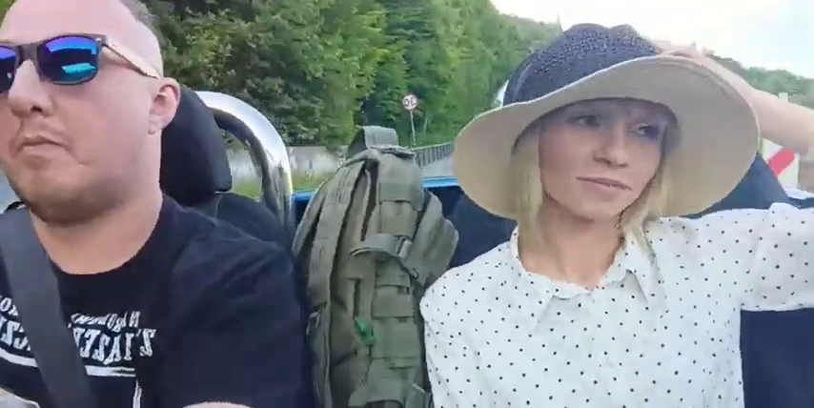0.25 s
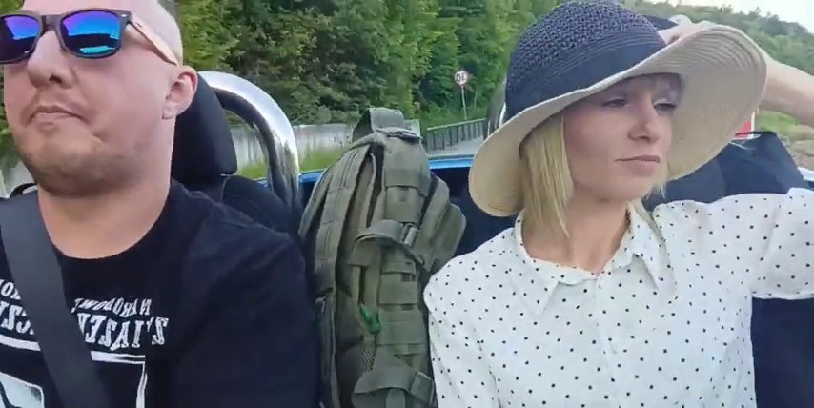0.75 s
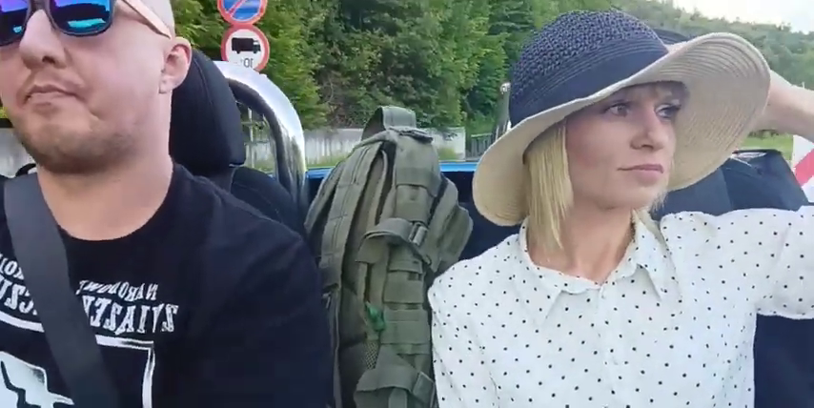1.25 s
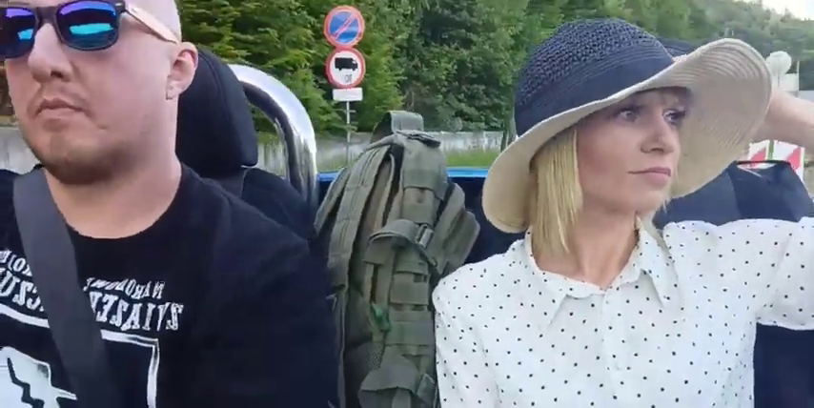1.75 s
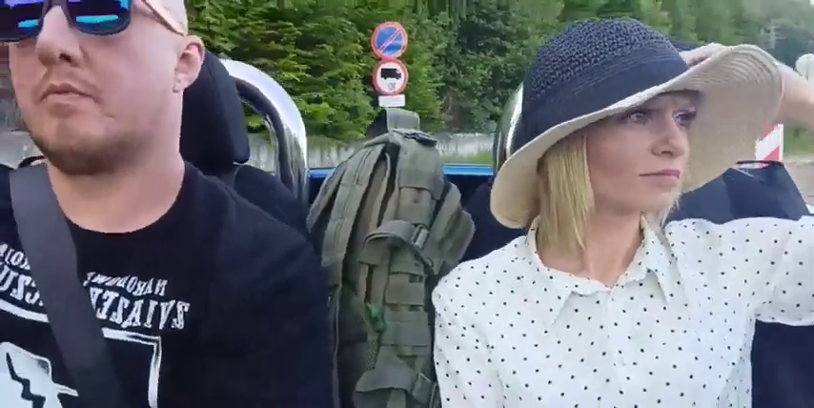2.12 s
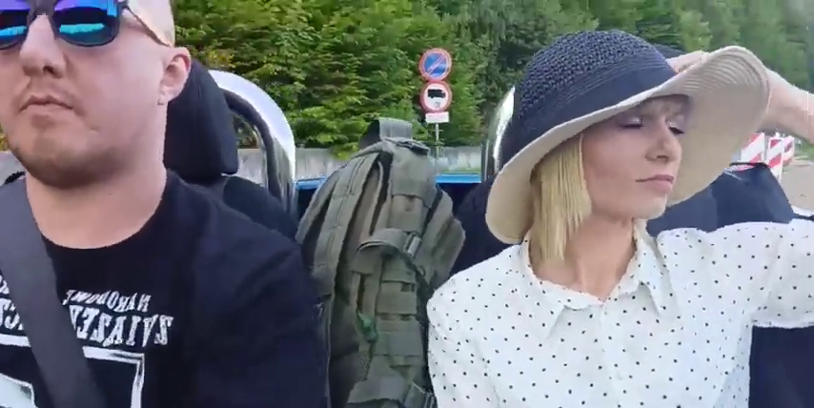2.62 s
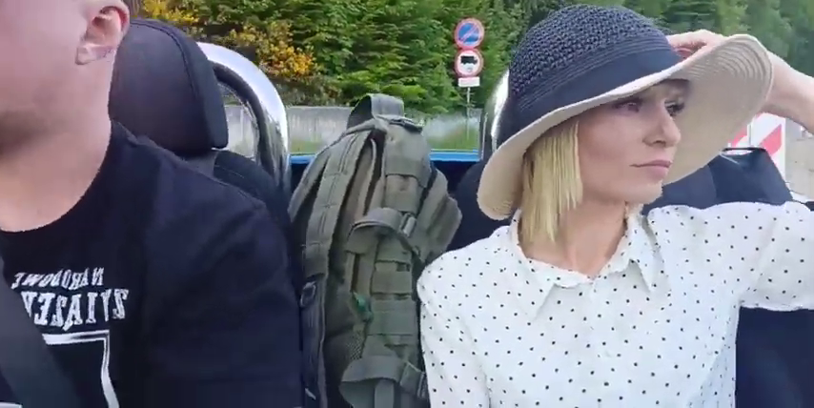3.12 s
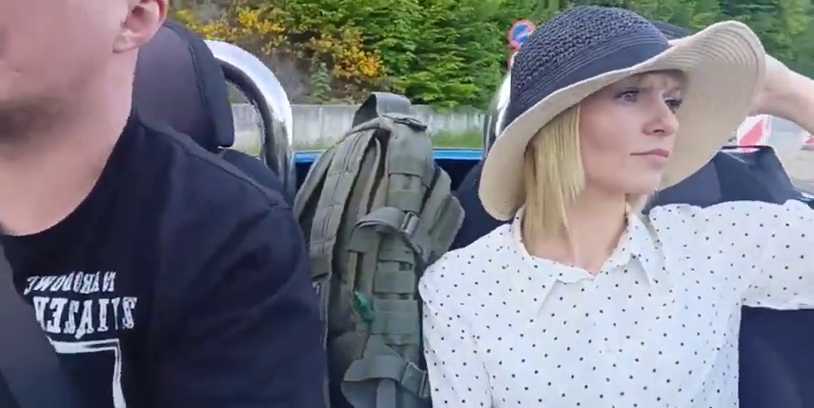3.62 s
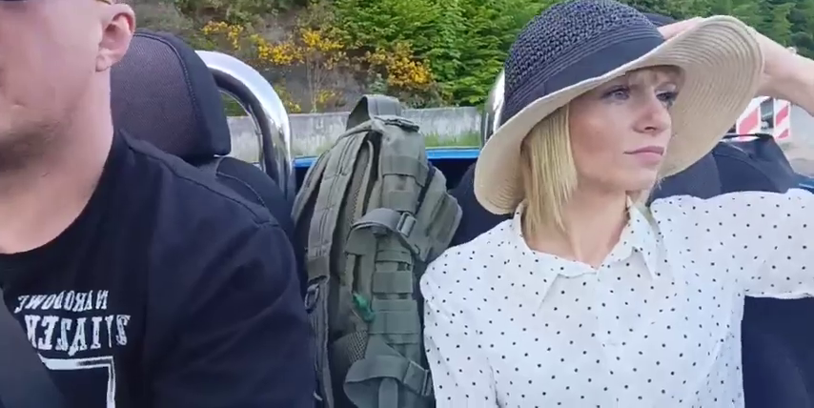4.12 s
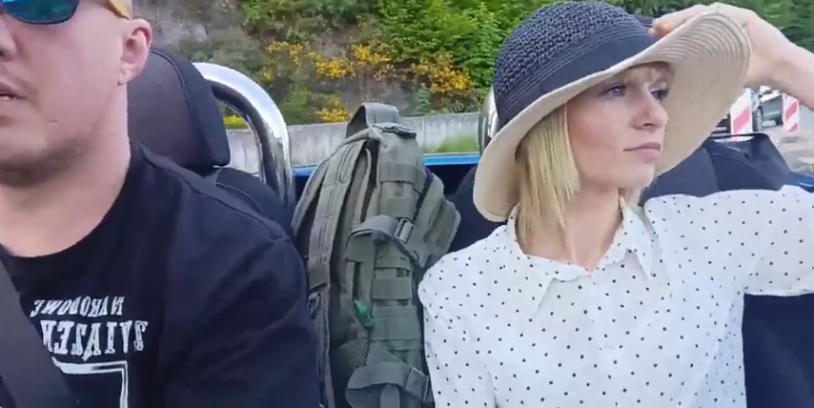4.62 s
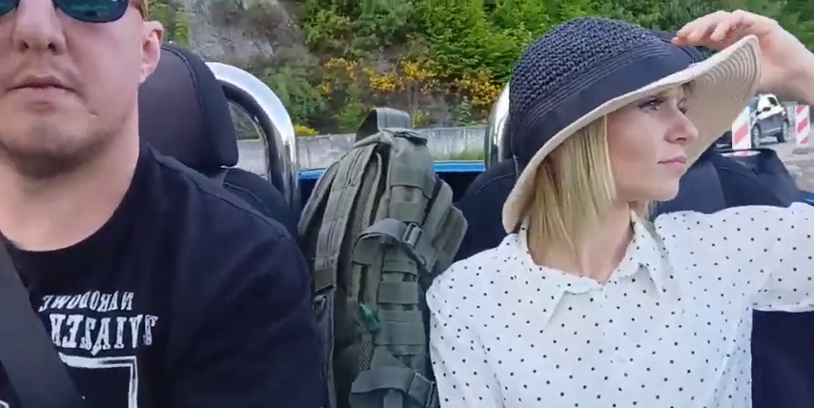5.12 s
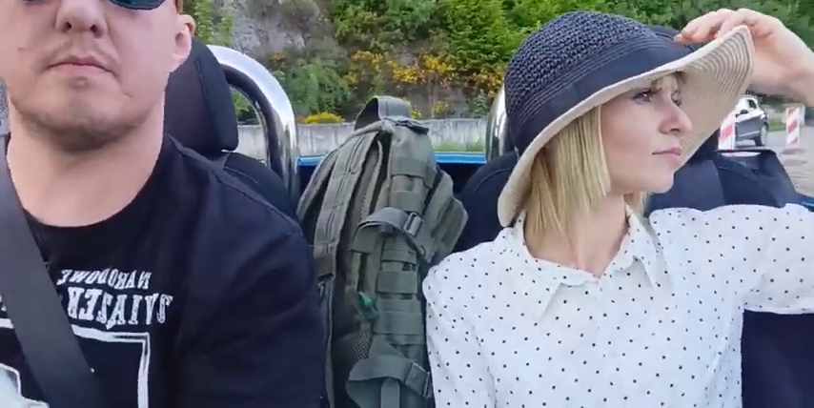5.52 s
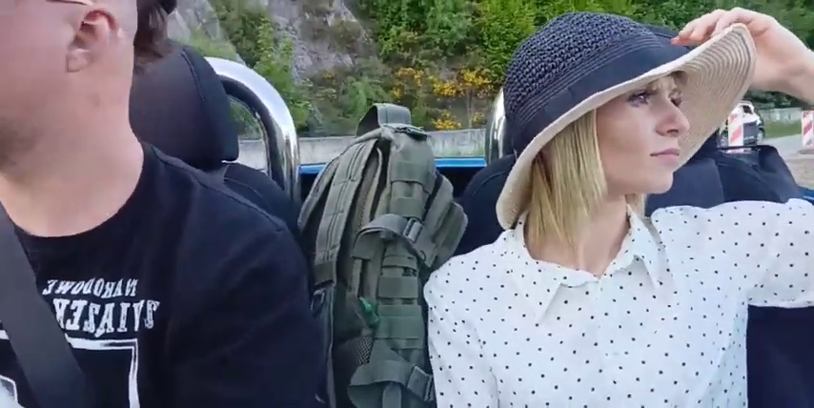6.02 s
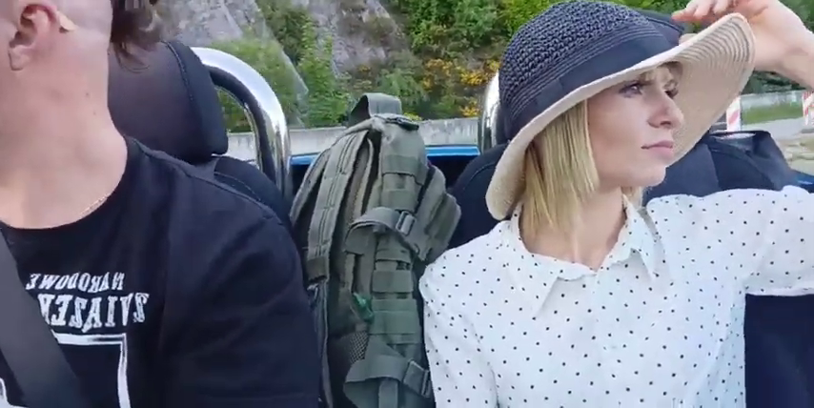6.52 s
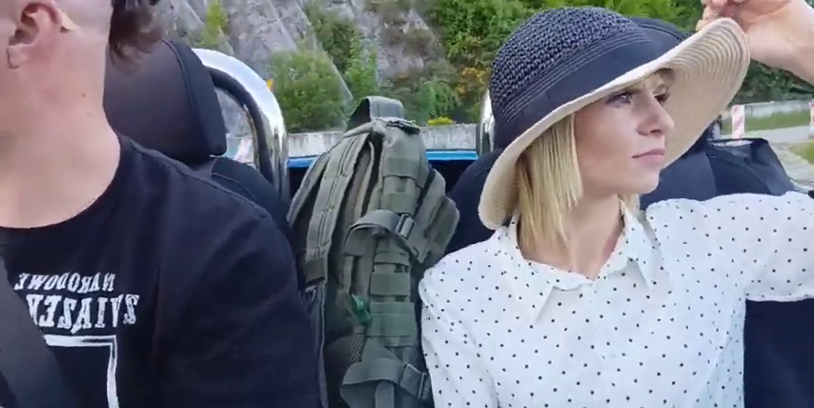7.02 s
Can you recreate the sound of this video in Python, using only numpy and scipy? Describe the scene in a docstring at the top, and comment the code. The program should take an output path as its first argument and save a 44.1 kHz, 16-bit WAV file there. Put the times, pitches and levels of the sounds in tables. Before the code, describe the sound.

Inside a moving convertible with the roof down, a microphone on a plastic mount picks up dull low road roar, a faint engine drone and bassy wind buffeting. Jolts thud through the body again and again, trim panels clack, a hard catch clicks, and the mount squeaks in tiny dry chirps. The start is windy and bumpy, the middle quieter with a sharp clack near three seconds, and the end rough again with a very heavy thump.

```python
"""Cabin of an open convertible on an uneven road, heard at a microphone on a plastic mount.
Engine, wind boom, tyre roar, tyre howl and air hiss are shaped noise that swells and flickers.
Jolts are damped sines with panel noise; trim knocks are short bursts of resonant noise.
A hard catch clicks by noise snaps and ringing modes; the mount squeaks by stick-slip."""
import sys
import numpy as np
from scipy import signal
from scipy.fft import rfft, irfft, next_fast_len
from scipy.io import wavfile
from scipy.ndimage import uniform_filter1d, map_coordinates

SR = 44100
rng = np.random.default_rng(int(sys.argv[2]) if len(sys.argv) > 2 else 0)


def put_to_file(sound):
    """Save the sound as 16-bit audio at rate SR, in the file named by the first command-line argument."""
    columns = np.atleast_2d(sound).T  # one column per channel
    safe = np.clip(columns, -1, 1)
    whole_steps = np.round(safe * 32767)
    wavfile.write(sys.argv[1], SR, whole_steps.astype(np.int16))


N = 319901
HIT_T = np.arange(SR // 5) / SR  # time axis of one contact, s
PEAK_S = 0.04  # peak of a stroke on that axis
MIC_LOW_HZ, TOP_HZ = 33, 15700  # band limits of the microphone
BOOM_DB, ROAR_DB, HOWL_DB, HISS_DB = 4, 1.64, -4, -1  # offsets to the RIDE levels
KNOCK_RISE_SHARE = 0.034  # rise over t60: long knocks are soft scuffs

# Base levels of the ride, before offsets: time_s, boom_db, roar_db, howl_db, hiss_db
RIDE = [(0.0, -21, -28.5, -37.5, -49.5), (0.52, -36.5, -28, -40, -49.5), (0.99, -31.5, -28.5, -47, -57.5),
        (1.69, -37.5, -30, -37, -48.5), (2.18, -39, -34.5, -47.5, -61), (3.07, -41, -32, -44, -52),
        (3.55, -39.5, -32.5, -38.5, -51), (3.78, -35, -34, -42, -53.5), (4.3, -32.5, -30, -41, -56.5),
        (4.81, -32.5, -31.5, -42, -55), (5.23, -33.5, -31, -43, -54.5), (5.57, -31, -30.5, -36.5, -53.5),
        (6.74, -32.5, -33, -42, -52), (7.25, -29.5, -25.5, -39.5, -52.5)]
# Gusts on the microphone, lulls where negative: peak_s, half_height_length_s, boom_swell_db
GUSTS = [(0, 0.081, -15), (.31, 0.13, 6), (.87, 0.15, -14), (1.0, 0.14, 7), (2.45, 0.23, 4),
         (2.87, 0.039, 4.5), (3.31, 0.074, 12), (3.46, .07, -22), (3.54, 0.052, 11.5), (5.33, 0.052, -9),
         (5.88, 0.075, 8.5), (6.3, 0.076, 6), (6.5, 0.066, 13.5), (7.15, 0.074, -8)]
# Rough patches, smooth where negative: middle_s, half_height_length_s, roar_swell_db, howl_swell_db
PATCHES = [(0.024, 0.052, 7, 7.5), (0.243, 0.08, 8.5, 6.5), (0.47, 0.097, 8, 3), (0.72, 0.064, -7, 14),
           (1.372, 0.042, 9.5, 10.5), (1.462, 0.04, 10, 4), (1.647, 0.014, -7, 13.5),
           (2.545, 0.11, -1, 9.5), (2.783, 0.036, 3.5, 17), (3.115, 0.081, 5, 11),
           (3.328, 0.044, 1.5, 14.5), (3.68, 0.11, 6, 7.5), (4.222, 0.07, -4, 8), (5.345, 0.023, 4, 13),
           (5.41, 0.1, 7.5, 16), (5.762, 0.044, -9.5, -4), (5.832, 0.048, 6, 6.5), (5.992, 0.2, 9, 5.5),
           (6.577, 0.069, 12, 15), (6.669, 0.024, -3.5, 0), (6.724, 0.094, 9, 10.5), (7.145, 0.11, -6.5, 9)]
# Wind boom spectrum: freq_hz, relative_density_db
BOOM_SPECTRUM = [(20, -29), (32, -25), (42, -7), (52, 2.5), (65, 4), (85, -1), (110, -8.5), (170, -32),
                 (400, -108)]
# Road roar spectrum: freq_hz, relative_density_db
ROAD_SPECTRUM = [(50, -19.5), (85, -2), (110, 1.5), (145, 1.5), (190, -4.5), (280, -6), (350, -14.5),
                 (430, -17.5), (560, -26.5), (1050, -37.5), (1600, -39), (4000, -85)]
# Tyre resonances: center_hz, width_hz, relative_level_db
TYRE_RESONANCES = [(433, 210, -11), (528, 72, 4.5), (653, 83, 1.5), (840, 120, -5)]
# Air hiss spectrum: freq_hz, relative_density_db
AIR_SPECTRUM = [(300, -26.5), (800, 11), (1200, 3), (1550, -2), (2000, 5.5), (2600, 1.5), (3000, -2),
                (3500, -9.5), (5000, -11.5), (7200, -12.5), (7800, -21), (9500, -26), (11000, -45.5),
                (15000, -57.5)]
# Friction noise spectrum: freq_hz, relative_density_db
GRIT_SPECTRUM = [(400, -29), (800, -5), (2000, 9), (3000, 0.5), (3600, 1), (7100, -10), (8000, -12.5),
                 (13000, -42.5)]
# Blows of the trim: time_s, relative_level_db, relative_crack_db, t60_s
KNOCKS = [(0.128, -24, -32, 0.065), (0.194, -17, -22, 0.12), (0.243, -31, -26, 0.14),
          (0.271, -17.5, -22.5, 0.033), (0.279, -18, -27, 0.043), (0.504, -25.5, -27, 0.08),
          (1.786, -28, -38, 0.069), (2.372, -34.5, -28, 0.19), (2.513, -27.5, -14.5, 0.17),
          (2.774, -31.5, -10.5, 0.069), (3.093, -22.5, -17.5, 0.18), (3.1285, -12, -21, 0.036),
          (3.134, -14, -27, 0.052), (4.599, -30, -27, 0.25), (5.379, -30.5, -12.5, 0.21),
          (5.399, -34, -16, 0.55), (5.484, -21, -23, 0.06), (5.802, -34, -20.5, 0.06),
          (5.928, -32, -23, 0.08), (5.989, -23.5, -23.5, 0.092), (6.562, -28, -17.5, 0.11),
          (6.675, -28.5, -16.5, 0.12), (7.012, -39, -18, 0.18)]
# Trim panel resonances: center_hz, width_hz, relative_level_db
TRIM_RESONANCES = [(420, 490, -3.5), (690, 200, 7), (914, 130, 0), (1228, 200, 4.5), (1670, 720, -6),
                   (1980, 260, 1.5), (2480, 430, -7.5), (2940, 230, -6)]
# Bright edge of a knock: freq_hz, relative_density_db
CRACK_SPECTRUM = [(1200, -18.5), (3000, 8.5), (4300, 2.5), (5800, 0), (7200, -4.5), (8200, -11),
                  (11000, -28), (15000, -46.5)]
# Snaps and ticks of the catch: start_s, relative_level_db, relative_ring_db
CLICKS = [(0.191, -31, 6), (0.543, -34, -15), (0.9286, -24, 10.5), (0.9375, -33.5, 8), (1.013, -35.5, 3.5),
          (1.074, -52, 2), (1.273, -41, -14), (1.322, -33, -18), (1.359, -43, -8), (1.469, -44.5, -13),
          (1.720, -45, -15), (2.095, -35.5, -27), (2.426, -43, -16), (2.768, -40.5, 7.5), (2.870, -35, -25),
          (2.980, -46, 2), (3.07, -42, -13), (3.207, -51.5, 4), (3.271, -49, 15.5), (3.646, -36, -10),
          (4.046, -48, 12), (4.082, -48, -10), (4.422, -35, -13), (5.196, -35, -22), (5.3296, -39, 15),
          (5.345, -31, 10), (5.3525, -24.5, 2), (5.384, -37.5, 2), (5.588, -47.5, -3), (6.587, -34.5, -6),
          (6.874, -47, -12)]
# Catch modes, before scatter: freq_hz, relative_level_db, t60_s
CATCH_MODES = [(1970, 5.5, 0.053), (2155, 2, 0.025), (2275, -2, 0.033), (2620, -10, 0.035),
               (3090, -5, 0.035), (4930, -10.5, 0.035), (5980, -10.5, 0.032), (7040, -17, 0.071)]
# Snap spectrum: freq_hz, relative_density_db
SNAP_SPECTRUM = [(800, -25), (1500, -13.5), (2300, 5.5), (3000, 6.5), (3800, 3.5), (4400, -0.5),
                 (5000, 1.5), (5900, 2.5), (7000, 2.5), (7900, -9.5), (9500, -19.5), (12000, -24.5),
                 (15000, -50.5)]
# Bright edge of a snap: freq_hz, relative_density_db
FIZZ_SPECTRUM = [(5000, -41.5), (8000, 1.5), (10000, -6), (15000, -25)]
# Jolts of the body: start_s, relative_level_db, pitch_hz, relative_shudder_db
BUMPS = [(0.217, -6, 162, -28), (0.445, -7.5, 141, -27), (0.575, -4.5, 102, -27), (0.948, -6.5, 107, -18),
         (1.261, -4.5, 145, -19), (1.323, -8, 77.6, -18), (1.456, -9, 108, -7.5), (1.735, -11, 95, -31),
         (1.82, -9.5, 134, -13.5), (2.776, -23.5, 171, 0), (2.982, -11, 111, -27), (3.117, -9, 71.6, -19),
         (3.148, -13, 267, -14.5), (3.664, -9, 70.4, -19.5), (3.85, -19.5, 158, -17),
         (3.942, -11.5, 208, -23), (5.346, -8, 297, -5), (5.36, -9, 257, -11.5), (5.387, -12, 155, -7.5),
         (5.409, -9.5, 72, -3), (5.436, -12.5, 72, -3.5), (6.017, -5, 138, -20.5), (6.117, -10, 126, -28),
         (6.519, -1.5, 59.5, -21), (6.571, -14.5, 294, -8.5), (6.613, -10.5, 144, -21),
         (6.647, -12, 61, -25), (6.735, -7, 140, -21), (7.083, -23, 298, -5)]
# Body panel resonances: center_hz, width_hz, relative_level_db
BODY_RESONANCES = [(283, 68, 0), (396, 90, -5.5), (570, 110, -8.5)]
# Rubs of the rocking mount: peak_s, length_s, mean_slip_hz, fundamental_db, octave_db, rasp_db (relative)
RUBS = [(0.32, 0.011, 1180, -38, -38.5, -43.5), (0.412, 0.0075, 1257, -43, -39.5, -65),
        (0.464, 0.023, 1174, -35, -43, -49), (0.581, 0.018, 1163, -35, -45, -52.5),
        (0.627, 0.017, 1168, -35, -39, -48.0), (0.688, 0.015, 1267, -40, -35, -46.5),
        (0.743, 0.014, 1160, -35.5, -40.5, -49.5), (0.894, 0.014, 1172, -39, -47, -55),
        (1.096, 0.012, 1210, -54, -52, -59), (1.269, 0.013, 1180, -37, -39, -48.5),
        (1.313, 0.0076, 1150, -36.5, -34.5, -45.5), (1.457, 0.011, 1280, -48, -43, -49),
        (1.56, 0.011, 1220, -48, -48, -56), (1.621, 0.012, 1280, -48, -42, -49.5),
        (1.869, 0.02, 1155, -34, -41.5, -44), (1.918, 0.013, 1240, -40, -39.5, -47),
        (2.159, 0.013, 1165, -43, -52, -56), (2.212, 0.033, 1203, -45, -53.0, -60),
        (2.381, 0.026, 1204, -43.5, -51.0, -58), (2.506, 0.017, 1245, -43, -46.5, -50),
        (2.551, 0.012, 1177, -39.5, -43, -50), (3.318, 0.011, 1142, -46, -44, -44.5),
        (3.37, 0.01, 1234, -42, -36, -54.5), (3.483, 0.011, 1232, -41, -37.5, -56.0),
        (3.523, 0.012, 1234, -42.5, -37, -46), (3.578, 0.017, 1156, -40.5, -49.0, -47),
        (3.613, 0.019, 1234, -43, -43.5, -48.5), (3.661, 0.016, 1262, -41, -49, -43),
        (3.709, 0.023, 1210, -42.5, -42, -51), (3.729, 0.012, 1219, -41, -37, -49),
        (3.893, 0.008, 1260, -41.5, -32.5, -55.5), (4.186, 0.014, 1270, -46, -41, -51.5),
        (4.235, 0.014, 1265, -46.5, -47, -57), (4.453, 0.0097, 1240, -41, -39, -59.0),
        (4.593, 0.02, 1210, -44, -44, -48.5), (4.66, 0.011, 1227, -42, -43.5, -52),
        (4.794, 0.02, 1213, -41.5, -46, -51), (4.835, 0.01, 1230, -40.5, -34.5, -49.5),
        (4.941, 0.011, 1250, -38, -31.5, -49.5), (4.999, 0.0099, 1244, -39, -39, -52),
        (5.232, 0.013, 1245, -40.5, -39.5, -47.5), (5.353, 0.018, 1227, -45, -32, -40),
        (5.398, 0.029, 1163, -50, -40.5, -43.5), (5.507, 0.0096, 1160, -44, -55, -46),
        (5.673, 0.011, 1170, -41, -48, -52.5), (5.765, 0.015, 1178, -39.5, -45.5, -50),
        (5.809, 0.011, 1268, -44, -48, -49), (5.867, 0.013, 1155, -41, -37, -46.5),
        (5.905, 0.0083, 1250, -52, -47, -51), (5.937, 0.018, 1175, -47.5, -46, -52),
        (6.052, 0.012, 1166, -43.5, -40.5, -48.5), (6.147, 0.012, 1155, -40.5, -41, -45.5),
        (6.216, 0.011, 1232, -38.5, -40.5, -56), (6.426, 0.012, 1273, -45, -43, -49.5),
        (6.479, 0.02, 1147, -39.5, -44.5, -50), (6.533, 0.021, 1153, -44, -51, -54.5),
        (7.004, 0.015, 1245, -37.5, -37.5, -49), (7.075, 0.013, 1172, -39.5, -41, -47.5),
        (7.216, 0.01, 1180, -39, -39, -49.5)]
# Upper partials of a slip, before scatter: multiple, level_re_rasp_db
OVERTONES = [(3, -11.5), (4, -12), (5, -10.5)]
# Modes of the rubbed plastic, before scatter: freq_hz, relative_level_db
RASP_MODES = [(1440, 2), (1780, 10), (1980, 13.5), (2310, 4.5), (2650, 6.5), (2880, -4), (3070, 6.5),
              (3780, -4), (4100, 1), (4950, -7), (5500, -7.5), (5800, -7.5), (6100, 4), (6650, -2.5),
              (7110, -10)]


def amp(db):
    """Decibels to gain."""
    return 10 ** (np.asarray(db) / 20)


def unit(x):
    """Scale to rms 1."""
    return x / np.sqrt(np.mean(x ** 2) + 1e-20)


def burst(x):
    """Scale a short sound so that its loudest 5 ms have rms 1."""
    return x / np.sqrt(uniform_filter1d(x ** 2, size=220).max() + 1e-20)


def wobble(rate_hz, size=N):
    """Smooth random curve with rate_hz knots a second."""
    knots = rng.standard_normal(int(size * rate_hz / SR) + 4)
    return map_coordinates(knots, [np.arange(size) * rate_hz / SR])


def resonant(peaks, size=N):
    """Noise of rms 1 shaped by resonances; each width is taken at half gain."""
    m = next_fast_len(size)
    f = np.fft.rfftfreq(m, 1 / SR)
    gain = sum(amp(db) / (1 + (2 * (f - hz) / width_hz) ** 2) for hz, width_hz, db in peaks)
    return unit(irfft(rfft(rng.standard_normal(m)) * gain, m)[:size])


def noise(spectrum, size=N):
    """Noise of rms 1 with its colour interpolated over log frequency."""
    m = next_fast_len(size)
    hz, db = np.transpose(spectrum)
    log_f = np.log(np.fft.rfftfreq(m, 1 / SR) + 1)
    gain = amp(np.interp(log_f, np.log(hz), db))
    return unit(irfft(rfft(rng.standard_normal(m)) * gain, m)[:size])


def add(track, start_s, sound):
    """Mix a sound into a track in place."""
    part = track[max(round(start_s * SR), 0):][:len(sound)]
    part += sound[:len(part)]


def engine(hz=62, width_hz=20, level_db=-41):
    """Exhaust drone: noise in one low resonance at a steady level."""
    return amp(level_db) * resonant([(hz, width_hz, 0)])


def curves(rows):
    """Per-sample curve for each column after the time."""
    time_s, *columns = np.transpose(rows)
    return [np.interp(np.arange(N) / SR, time_s, column) for column in columns]


def swells(rows):
    """Sum of smooth dB humps from middle_s, half_height_length_s, swell_db rows."""
    t = np.arange(N) / SR
    return sum(db * 2 ** -(2 * (t - middle_s) / length_s) ** 2 for middle_s, length_s, db in rows)


def eddies(x, depth_db):
    """Passing eddies lift and drop each part of the spectrum on its own for a few tens of ms."""
    z = signal.stft(x, nperseg=1024)[2]
    field = rng.standard_normal(z.shape)
    field = uniform_filter1d(field, size=3, axis=0)
    field = uniform_filter1d(field, size=3, axis=1)
    return unit(signal.istft(z * amp(depth_db * unit(field)), nperseg=1024)[1][:N])


def rolling():
    """Boom swells in gusts, roar and howl on rough patches; all, with the hiss, share one gust curve."""
    boom_db, roar_db, howl_db, hiss_db = curves(RIDE)
    boom_db = boom_db + swells(GUSTS)
    roar_db = roar_db + swells((s, length_s, roar) for s, length_s, roar, _ in PATCHES)
    howl_db = howl_db + swells((s, length_s, howl) for s, length_s, _, howl in PATCHES)

    gust = wobble(22)
    boom = amp(boom_db + BOOM_DB) * unit(noise(BOOM_SPECTRUM) * amp(0.28 * gust))
    roar_flutter = amp(1.52 * gust + 1.84 * wobble(55))
    roar = amp(roar_db + ROAR_DB) * unit(noise(ROAD_SPECTRUM) * roar_flutter)
    tyres = resonant(TYRE_RESONANCES) * amp(1.4 * gust)
    howl = amp(howl_db + HOWL_DB) * eddies(tyres, depth_db=4.5)
    hiss_flutter = amp(0.8 * gust + 1.2 * wobble(50))
    hiss = amp(hiss_db + HISS_DB) * eddies(noise(AIR_SPECTRUM) * hiss_flutter, depth_db=5.5)
    return boom + roar + howl + hiss


def swell(rise_s, t60_s):
    """Contact envelope: builds up over about rise_s, then dies away."""
    attack = 1 - np.exp(-(HIT_T / rise_s) ** 2)
    return attack * amp(-60 * np.maximum(HIT_T - rise_s, 0) / t60_s)


def puff(spectrum, rise_s, t60_s):
    """Short burst of coloured noise."""
    return burst(noise(spectrum, size=len(HIT_T)) * swell(rise_s, t60_s))


def chatter(count=170, level_db=-61, spread_db=1.0, t60_s=0.045, follow=0.8):
    """Loose trim: faint dry puffs at random times, louder where the base roar level is higher."""
    out = np.zeros(N)
    roar_db = curves(RIDE)[1]
    for start_s, size in rng.uniform([0, -1], [N / SR, 1], (count, 2)):
        add(out, start_s, amp(level_db + spread_db * size) * puff(GRIT_SPECTRUM, 0.002, t60_s))
    return out * amp(follow * (roar_db - roar_db.mean()))


def knocks(rattle_db=3):
    """Trim panels slap and rattle: a dead, hollow clack of resonant noise with a bright edge."""
    out = np.zeros(N)
    for time_s, db, crack_db, t60_s in KNOCKS:
        rise_s = KNOCK_RISE_SHARE * t60_s
        rattle = amp(rattle_db * wobble(288, size=len(HIT_T)))
        body = burst(resonant(TRIM_RESONANCES, size=len(HIT_T)) * swell(rise_s, t60_s) * rattle)
        crack = burst(puff(CRACK_SPECTRUM, rise_s, t60_s) * rattle)
        add(out, time_s - 0.001, amp(db - 5.5) * (body + amp(crack_db + 5.0) * crack))
    return out


def ring(modes, rise_s, scatter_db):
    """Decaying modes with new strengths and one shared slight detuning per contact."""
    detune = rng.normal(1, 0.012)
    tones = 0
    for hz, db, t60_s in modes:
        gain = amp(db + scatter_db * rng.standard_normal())
        sine = np.sin(2 * np.pi * (hz * detune * HIT_T + rng.random()))
        tones = tones + gain * swell(rise_s, t60_s) * sine
    return burst(tones)


def stroke(rise_s, t60_s):
    """Rub envelope: friction builds up gradually to PEAK_S, then dies away."""
    late = HIT_T - PEAK_S
    return np.exp(-(np.minimum(late, 0) / rise_s) ** 2) * amp(-60 * np.maximum(late, 0) / t60_s)


def clicks(rough_db=3.5, fizz_db=-14):
    """A hard catch snaps home: ragged noise with a brief fizz, and ringing modes."""
    out = np.zeros(N)
    for start_s, db, ring_db in CLICKS:
        tone = ring(CATCH_MODES, rise_s=0.002, scatter_db=3)
        ragged = amp(rough_db * wobble(330, size=len(HIT_T)))
        snap_noise = noise(SNAP_SPECTRUM, size=len(HIT_T))
        snap = burst(snap_noise * stroke(rise_s=0.0028, t60_s=0.064) * ragged)
        fizz_noise = noise(FIZZ_SPECTRUM, size=len(HIT_T))
        fizz = burst(fizz_noise * stroke(rise_s=0.0026, t60_s=0.074))
        # the snap peaks 1.9 ms after the ring starts
        add(out, start_s + 0.0019 - PEAK_S, amp(db - 5.0) * (snap + amp(fizz_db) * fizz))
        add(out, start_s, amp(db + ring_db - 7.5) * tone)
    return out


def bumps(rise_s=0.003, t60_s=0.1):
    """Each jolt gives the body a few heavily damped swings and makes its panels shudder."""
    out = np.zeros(N)
    for start_s, db, hz, shudder_db in BUMPS:
        thud = burst(np.sin(2 * np.pi * hz * HIT_T) * swell(rise_s, t60_s))
        shudder = burst(resonant(BODY_RESONANCES, size=len(HIT_T)) * swell(0.0034, 0.12))
        add(out, start_s, amp(db - 7.5) * (thud + amp(shudder_db + 2.0) * shudder))
    return out


def rasp(rise_s, t60_s, scatter_db=6.5, grit_db=-3, detune=0.02, rough_db=3):
    """Short dry rub: plastic modes vary at each point of contact, over a little grit."""
    tones = 0
    for hz, db in RASP_MODES:
        gain = amp(db + scatter_db * rng.standard_normal())
        tones = tones + gain * np.sin(2 * np.pi * (hz * rng.normal(1, detune) * HIT_T + rng.random()))
    grit = amp(grit_db) * noise(GRIT_SPECTRUM, size=len(HIT_T))
    roughness = amp(rough_db * wobble(184.7, size=len(HIT_T)))
    return burst((unit(tones) + grit) * stroke(rise_s, t60_s) * roughness)


def rub(length_s, slip_hz, low_db, octave_db, rasp_db,
        rise_share=0.59, decay_share=4.6, waver=0.033, lag_s=0.0031, ring_t60_s=0.11):
    """Unsteady stick-slip: overtones and rasp follow the stroke, the fundamental rings on."""
    rise_s, t60_s = rise_share * length_s, decay_share * length_s
    rate_hz = slip_hz * (1 + waver * wobble(520, size=len(HIT_T)))
    phase = 2 * np.pi * np.cumsum(rate_hz) / SR
    partials = [(2, octave_db - 0.7)]
    for multiple, db in OVERTONES:
        partials.append((round(multiple), rasp_db + db + 4 * rng.standard_normal()))
    squeak = sum(amp(db) * burst(np.sin(k * phase) * stroke(rise_s, t60_s)) for k, db in partials)
    lagged_stroke = np.interp(HIT_T - lag_s, HIT_T, stroke(rise_s, ring_t60_s))
    body = burst(np.sin(phase) * lagged_stroke)
    return squeak + amp(low_db) * body + amp(rasp_db + 5.5) * rasp(rise_s, t60_s)


def squeaks():
    """Each swing of the mount rubs differently, from a clear chirp to a dry scuff."""
    out = np.zeros(N)
    for peak_s, *shape in RUBS:
        add(out, peak_s - PEAK_S, rub(*shape))
    return out


def scene():
    """Sum of all sources at one microphone."""
    return (engine() + rolling() + chatter() + knocks() + clicks() + bumps() + squeaks())[None]


def record(dry):
    """Round off the highest peaks, shed the deepest bass, cut everything above TOP_HZ."""
    soft = dry / (1 + (dry / 0.65) ** 6) ** (1 / 6)
    m = next_fast_len(N + SR // 2)
    f = np.fft.rfftfreq(m, 1 / SR)
    low_cut = 1 / np.sqrt(1 + (MIC_LOW_HZ / (f + 1)) ** 8)
    return irfft(rfft(soft, m) * low_cut * (f < TOP_HZ), m)[..., :N]


dry = scene()
out = record(dry)
put_to_file(out)
```